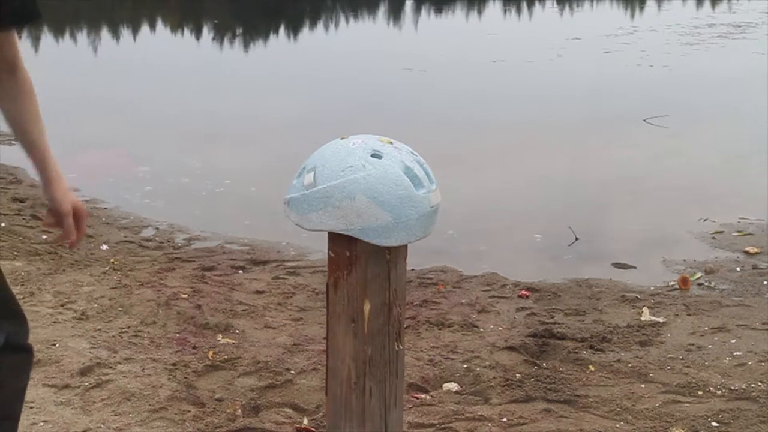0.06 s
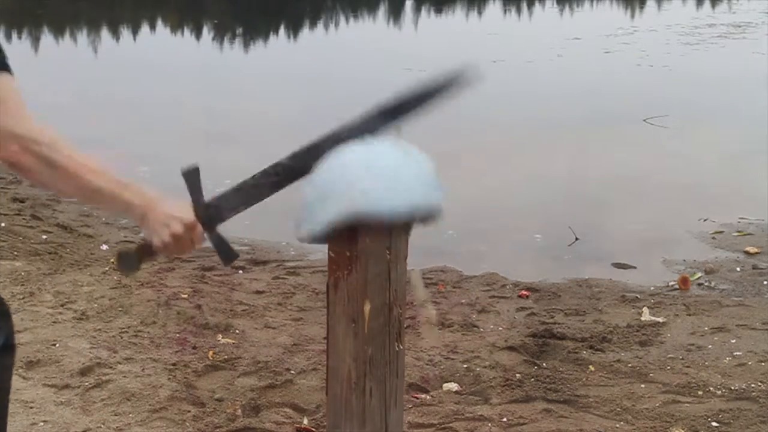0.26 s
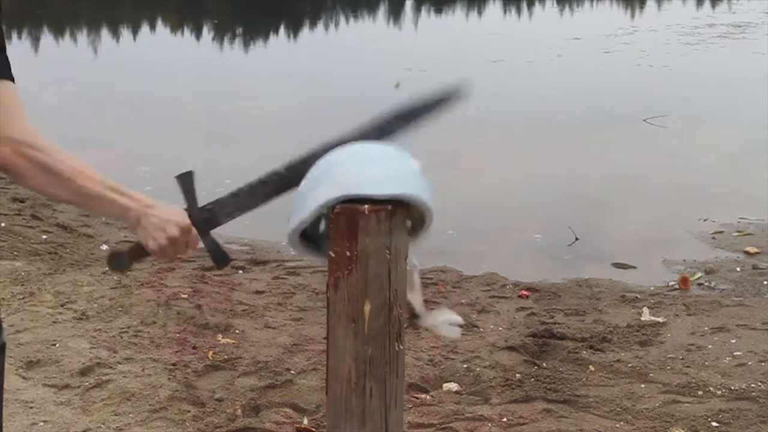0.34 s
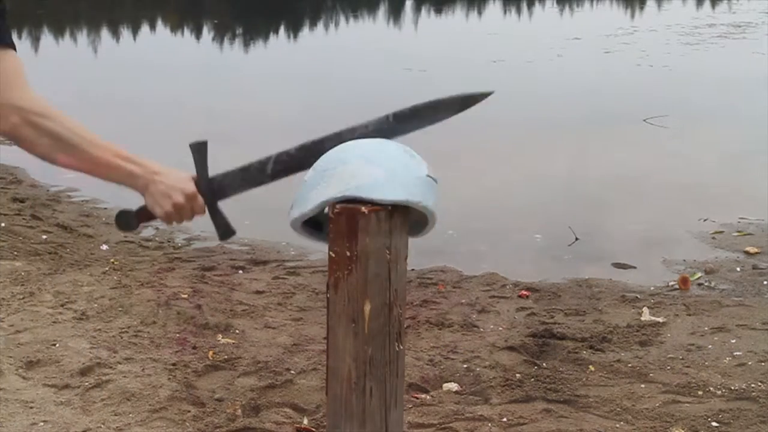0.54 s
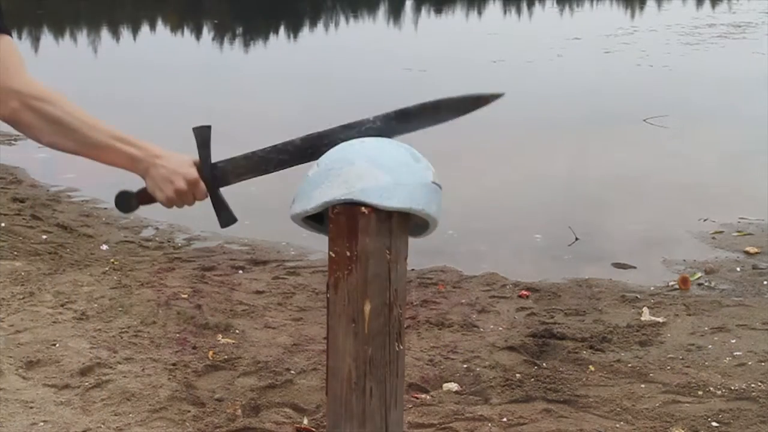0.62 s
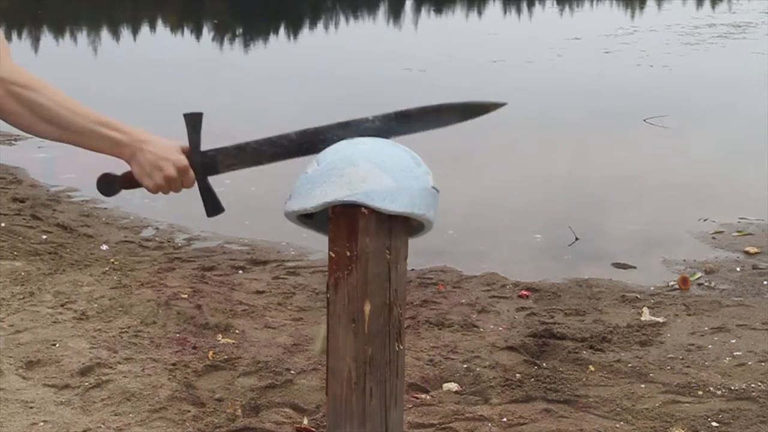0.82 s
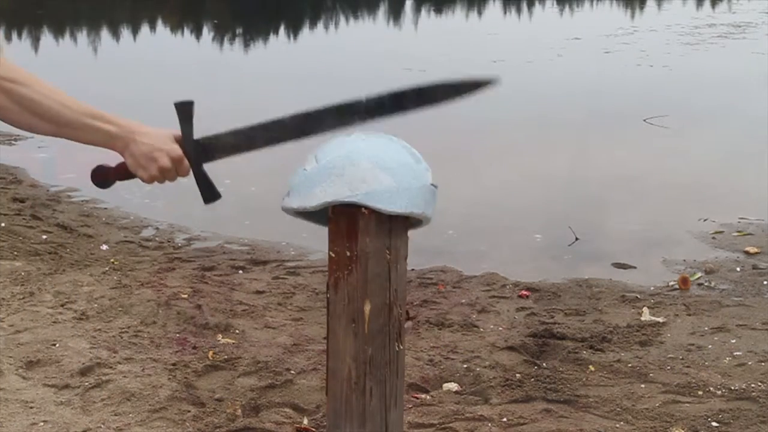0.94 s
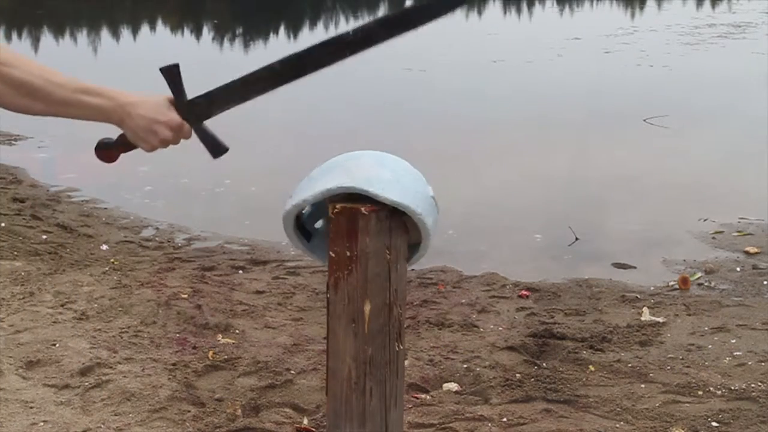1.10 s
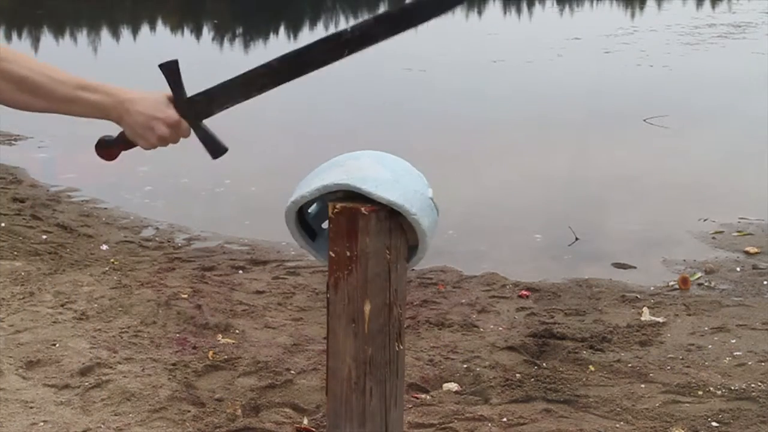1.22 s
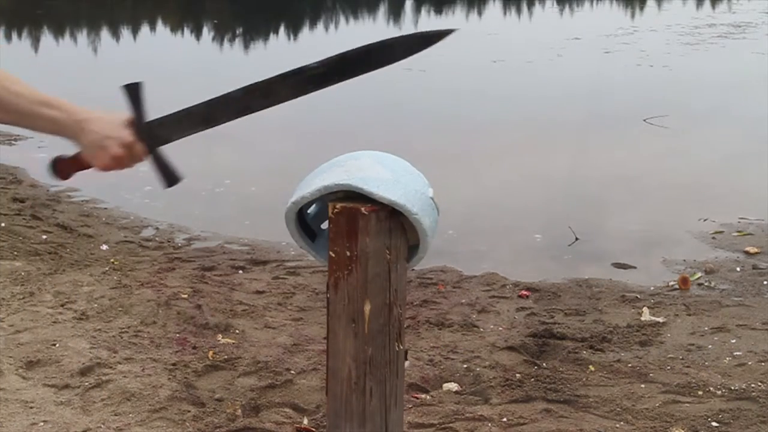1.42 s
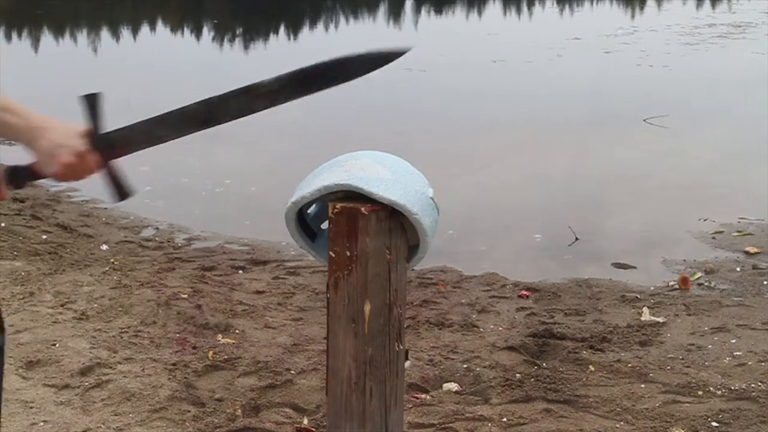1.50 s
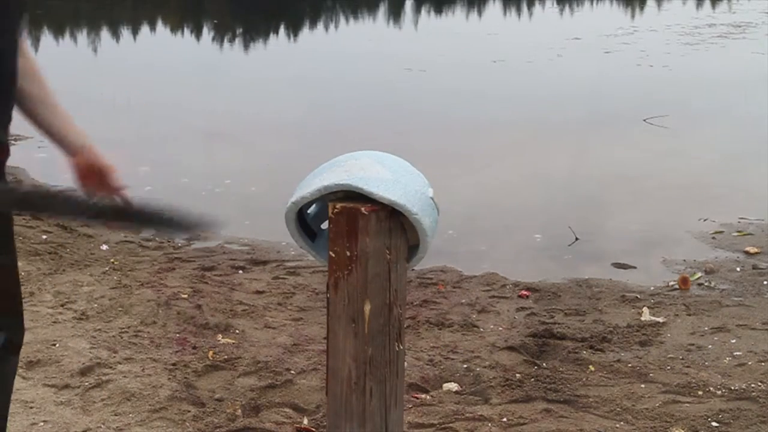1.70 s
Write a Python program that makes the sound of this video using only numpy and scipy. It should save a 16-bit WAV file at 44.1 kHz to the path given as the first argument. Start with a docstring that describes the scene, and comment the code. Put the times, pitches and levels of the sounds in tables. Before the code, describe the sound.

A sword cracks loudly on a plastic helmet outdoors, then the helmet knocks faintly.

```python
"""Sword on a plastic helmet

A sword swishes down and cracks on a hard plastic helmet on a wooden post, overloading the microphone.
The blade rings faintly, slides over the shell and lifts off; the helmet rocks and knocks on the post.
It is outdoors by a lake, with a soft hiss and a low throb like an idling engine underneath."""
import sys
import numpy as np
from scipy import signal
from scipy.fft import rfft, irfft
from scipy.io import wavfile

SR = 44100
rng = np.random.default_rng(int(sys.argv[2]) if len(sys.argv) > 2 else 0)


def dump(signal):
    """Clip the signal to [-1, 1] and save it as 16-bit WAV at the path in sys.argv[1]."""
    limited = np.clip(np.atleast_2d(signal).T, -1, 1)
    pcm = np.round(limited * 32767).astype(np.int16)
    wavfile.write(sys.argv[1], SR, pcm)


N = 77175
T = np.arange(N) / SR

# Ringing tones of each object (f/Hz, level/dB, t60/s); t60 is the time to fade by 60 dB
SHELL_TONES = [(190, 0, 0.064), (318.6, -6.5, 0.045), (464.6, -12.5, 0.1), (510, 6, 0.035),
               (714, 1.5, 0.037), (1000, -19.5, 0.03), (1140, -4, 0.043), (1209, -4, 0.039),
               (1477, -9.5, 0.021), (2435, -9, 0.04), (2757, -13, 0.0353), (3410, -6, 0.038)]
BLADE_TONES = [(408, -26, .4), (1045, -32.5, 1.1), (1281, -32, .42), (4016, -43, .35), (4452, -45, .35)]  # damped by the hand
POST_TONES = [(190, -7.5, 0.13), (542, -1.5, 0.036), (608, -1.5, 0.044), (740, -22, 0.046)]
RIM_TONES = [(525, -4, 0.11), (1320, -4, 0.034), (1485, -2.5, 0.033), (1766, -0.5, 0.021),
             (2420, 0.5, 0.03), (3205, -0.5, 0.025), (3570, -23, 0.032), (4474, -3, 0.022)]  # the helmet's hollow-sounding edge
# Scuffs of the rocking helmet (t/s, rise/s, t60/s, post level/dB, then low, mid, high, top level/dB)
SCUFFS = [(.272, 0.0025, 0.043, -28, -38, -28, -23.5, -19.5),
          (0.312, 0.003, 0.066, -26, -29, -27, -21.5, -21.5),
          (0.383, 0.0018, 0.058, -29, -42, -22, -25, -28),
          (.472, 0.005, 0.055, -22.5, -23.5, -29.5, -30, -29),
          (.4975, 0.0017, 0.079, -26.5, -57, -31, -31, -35), (0.533, 0.0025, .04, -40, -36, -48, -49, -51),
          (0.58, 0.0013, 0.091, -37.5, -46, -41, -43, -42.5),
          (.727, 0.0034, 0.014, -38, -44, -38.5, -55, -48),
          (0.857, 0.0032, 0.062, -40.5, -53, -35, -39.5, -39),
          (.929, 0.00061, 0.031, -44, -44, -35.5, -44.5, -46),
          (1.023, 0.0033, 0.078, -43, -37, -42.5, -41.5, -45.5),
          (1.0648, 0.002, 0.047, -33, -44, -32.5, -30.5, -28.5),
          (1.173, 0.0099, 0.04, -54, -51, -40.5, -53, -48), (1.191, 0.0048, 0.025, -69, -52, -53, -52, -46),
          (1.2565, 0.00068, 0.059, -48.5, -68, -45.5, -48.5, -46.5),
          (1.576, 0.011, 0.066, -63, -59.5, -56, -54, -51),
          (1.742, 0.021, 0.066, -65.5, -79, -62, -55, -53.5)]
# Borders of those low, mid, high and top bands (f/Hz)
SCUFF_EDGES = [480, 1000, 2000, 5000, 14500]
# Squeaks of the rubbing shell (t/s, f/Hz, level/dB, length/s)
SHELL_SQUEAKS = [(.275, 2880, -28, .006), (.311, 8500, -29, .0032), (.313, 4450, -22, .0035),
                 (.3845, 3950, -24, .0023), (.5, 2950, -37, .005), (1.033, 1510, -35, .007)]
# Clacks of the rim as it settles (t/s, level/dB, favoured f/Hz, share of the full ring time)
CLACKS = [(.857, -41, 1300, 0.54), (1.0647, -25.5, 1480, 0.86), (1.1703, -33.5, 1880, .3),
          (1.2562, -36.5, 2900, 0.56), (1.4053, -42, 1500, 0.42)]
# Loudness over time (t/s, level/dB)
SLIDE_LEVELS = [(.23, -56.5), (.27, -42), (.44, -41.5), (.52, -41), (.6, -42), (.73, -44), (.84, -47),
                (.93, -48), (1.0, -53), (1.12, -54), (1.3, -53.5), (1.5, -57.5)]  # blade on the shell
RUMBLE_LEVELS = [(0, -55), (.22, -51.5), (.3, -30), (.5, -42.5), (.8, -49.5), (1.2, -51.5), (1.75, -49)]  # swells after the blow
# How often the engine fires (t/s, f/Hz)
FIRING_RATE = [(0, 26.86), (.7, 27.18), (1.35, 26.46), (1.75, 26.61)]
# Colours: how strong a sound's low and high parts are next to each other (f/Hz, level/dB)
CRUNCH_COLOUR = [(110, -45.5), (300, -0.5), (620, 2.5), (850, 9), (1300, 9.5), (2000, 4.5), (4100, -2.5),
                 (5600, -7.5), (10500, -6.5), (16000, -7)]  # plastic under the edge
SCRAPE_COLOUR = [(100, -15.5), (350, -4.5), (600, 5.5), (1500, 7), (3000, 4), (6000, -0.5), (11000, -1.5),
                 (16000, -5.5)]  # steel sliding on plastic
SWISH_COLOUR = [(60, -34.5), (200, 8), (550, 7), (1000, 4), (2000, -3), (8000, -48)]  # air round the blade
SHORE_COLOUR = [(100, -26), (1200, 3.5), (4000, 6), (15000, -4)]  # echo from the shore
EXHAUST_COLOUR = [(40, -26), (54, -18), (80, -34.5), (107, 3), (133, 1.5), (160, 0), (188, -21.5),
                  (214, -8.5), (245, -16.5), (320, -30.5), (600, -60.5), (1500, -87)]  # one engine puff
HISS_COLOUR = [(180, -29), (300, -17.5), (417, 2), (453, -5.5), (744, -7.5), (1030, -19.5), (2140, -15.5),
               (9930, -29.5), (15500, -43)]  # outdoor air
LOW_COLOUR = [(15, -13.5), (45, -9.5), (75, -4.5), (130, 0), (210, -1.5), (330, -22), (2000, -60)]  # low rumble

BLOW_S, BLOW_T60 = .2347, .075  # when the sword lands; fade of its crunch and swish


def blow(shell_db=2, crunch_db=-4, swell_s=.0034):
    """The edge lands: shell and blade ring, the plastic crunches and the edge skids with a squeak."""
    crunch = amp(crunch_db) * noise(CRUNCH_COLOUR) * burst(BLOW_S + swell_s, 2 * swell_s, BLOW_T60)
    skid = squeak(at=BLOW_S + .00273, hz=11300, db=0, length=.00093, width_hz=1300)
    ringing = amp(shell_db) * ring(SHELL_TONES, BLOW_S) + ring(BLADE_TONES, BLOW_S)
    return (ringing + crunch + skid) * (T > BLOW_S)


def knocks(grit_db=4.5, shell_db=-8):
    """The rocking helmet scuffs against post and blade and makes the post ring; some scuffs squeak."""
    rub = rng.standard_normal(N)
    through_shell = signal.fftconvolve(rub, ring(SHELL_TONES, 0))[:N]
    grit = flutter(grit_db, lo_hz=258, hi_hz=1160)
    layers = []
    for lo, hi in zip(SCUFF_EDGES, SCUFF_EDGES[1:]):
        layer = band(rub, lo, hi)
        if lo < SHELL_TONES[-1][0]:  # the shell adds nothing to a band above its highest tone
            layer += amp(shell_db) * band(through_shell, lo, hi)
        layers.append(unit(grit * layer))
    out = sum(squeak(*row, width_hz=110) for row in SHELL_SQUEAKS)
    for at, rise, t60, post_db, *bands_db in SCUFFS:
        scuff = burst(at, rise, t60) * (amp(bands_db) @ np.array(layers))
        out += scuff + amp(post_db) * ring(POST_TONES, at)
    return out


def rim_clacks(octave_drop_db=4, echo_db=-10, echo_s=.0053):
    """The rim clacks on the post, ringing less where it stays pressed; the ground echoes each clack."""
    out = np.zeros(N)
    for at, db, favoured_hz, share in CLACKS:
        tones = [(hz, level - octave_drop_db * np.log2(hz / favoured_hz) ** 2, t60 * share)
                 for hz, level, t60 in RIM_TONES]
        out += amp(db) * (ring(tones, at) + amp(echo_db) * ring(tones, at + echo_s))
    return out


def slide():
    """Steel dragged over plastic makes a grainy hiss."""
    grain = flutter(depth_db=2, lo_hz=3, hi_hz=260)
    return amp(curve(SLIDE_LEVELS)) * unit(noise(SCRAPE_COLOUR) * grain)


def swish(db=-48.5, rise_s=.018):
    """Air rushes round the blade, louder and louder until it lands."""
    return amp(db) * noise(SWISH_COLOUR) * burst(BLOW_S, rise_s, BLOW_T60)


def shore_echo(x, db=-22.5, t60=.8):
    """The shore scatters the sound back as a thin, fading tail."""
    tail = noise(SHORE_COLOUR) * np.exp(-np.log(1000) * T / t60)
    return amp(db) * signal.fftconvolve(x, tail / np.linalg.norm(tail))[:N]


def engine(db=-40, spread_db=.15):
    """Each firing sends one puff through a dull exhaust pipe."""
    count = np.floor(.63 + np.cumsum(curve(FIRING_RATE)) / SR)  # firings so far
    pulses = np.diff(count, prepend=count[0]) * amp(spread_db * rng.standard_normal(N))
    # Turn the colour into a puff that starts fast and then dies away (minimum phase)
    log_gain = np.log(gain_at(EXHAUST_COLOUR, abs(np.fft.fftfreq(8192, 1 / SR))))
    spectrum = np.exp(np.conj(signal.hilbert(log_gain)))
    puff = np.fft.ifft(spectrum).real[:4096]
    return amp(db) * unit(signal.fftconvolve(pulses, puff)[:N])


def air(hiss_db=-58):
    """A steady outdoor hiss, and a low rumble that swells after the blow."""
    return amp(hiss_db) * noise(HISS_COLOUR) + amp(curve(RUMBLE_LEVELS)) * noise(LOW_COLOUR)


def ring(tones, start, contact_s=.0001):
    """A struck object's tones build up with the force of the hit, then fade."""
    t = np.maximum(T - start, 0)
    ringing = sum(amp(db) * np.exp(-np.log(1000) * t / t60) * np.cos(2 * np.pi * hz * t)
                  for hz, db, t60 in tones)
    return ringing * (1 - np.exp(-t / contact_s))


def squeak(at, hz, db, length, width_hz):
    """Surfaces stick and slip, making a short, unsteady tone."""
    wander = np.sqrt(2 * np.pi * width_hz / SR) * rng.standard_normal(N)
    phase = np.cumsum(2 * np.pi * hz / SR + wander)
    swell = np.exp(-.5 * ((T - at) / length) ** 2)
    return amp(db) * swell * np.sqrt(2) * np.sin(phase)


def burst(at, rise, t60):
    """A loudness shape that swells to one moment and dies away."""
    return np.exp(np.minimum(T - at, 0) / rise - np.log(1000) * np.maximum(T - at, 0) / t60)


def flutter(depth_db, lo_hz, hi_hz):
    """A random wobble in loudness that makes a sound rough."""
    return amp(depth_db * band(rng.standard_normal(N), lo_hz, hi_hz))


def noise(colour):
    """Noise of the given colour, at strength 1."""
    gains = gain_at(colour, np.fft.rfftfreq(N, 1 / SR))
    return unit(irfft(rfft(rng.standard_normal(N)) * gains, N))


def band(x, lo_hz, hi_hz):
    """Keeps the part between two frequencies, at strength 1."""
    return unit(signal.sosfilt(signal.butter(3, [lo_hz, hi_hz], "band", fs=SR, output="sos"), x))


def gain_at(colour, f):
    """Reads a colour table at frequencies f, as multipliers."""
    hz, db = np.transpose(colour)
    return amp(np.interp(np.log(f + 1), np.log(hz), db))


def curve(points):
    """Joins points in time with straight lines."""
    return np.interp(T, *np.transpose(points))


def amp(db):
    """Turns decibels into a multiplier."""
    return 10 ** (np.asarray(db) / 20)


def unit(x):
    """Scales a sound to an average strength (rms) of 1."""
    return x / np.sqrt(np.mean(x ** 2) + 1e-20)


def scene():
    """Swing, blow and rattle over the lakeside background."""
    near = swish() + blow() + knocks() + rim_clacks() + slide()
    return (near + shore_echo(near) + engine() + air())[None]


def record(dry, low_cut_hz=12.5, high_cut_hz=15800):
    """An automatic volume control dips after the blow, too late to stop it from clipping."""
    limit_db, share_removed, react_s, recover_db_per_s = -27.5, .49, .018, 53.5
    x = signal.lfilter(*signal.butter(1, low_cut_hz, "high", fs=SR), dry[0])
    keep = np.exp(-1 / (react_s * SR))
    smoothing = [1 - keep], [1, -keep]
    level_db = 10 * np.log10(signal.lfilter(*smoothing, x ** 2) + 1e-12)
    fall = recover_db_per_s * T
    held_db = np.maximum.accumulate(level_db + fall) - fall  # holds each peak, then lets it sink
    excess_db = np.maximum(held_db - limit_db, 0)
    volume = amp(-share_removed * signal.lfilter(*smoothing, excess_db))
    clipped = np.clip(x * volume, -1, 1)
    high_cut = signal.firwin(255, high_cut_hz, window=("kaiser", 8), fs=SR)
    return signal.oaconvolve(clipped, high_cut, "same")[None]


dry = scene()
out = record(dry)
dump(out)
```